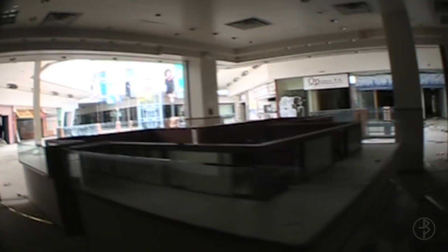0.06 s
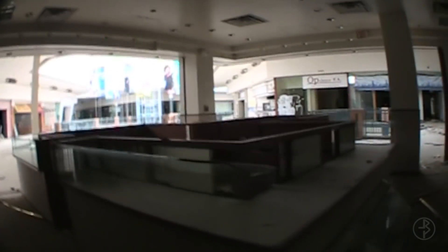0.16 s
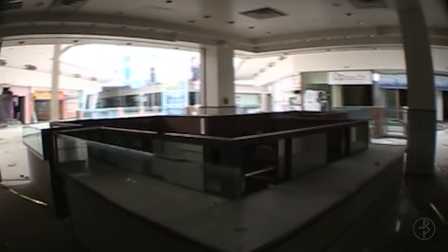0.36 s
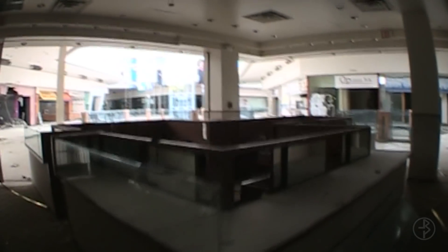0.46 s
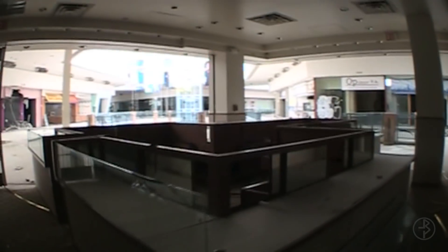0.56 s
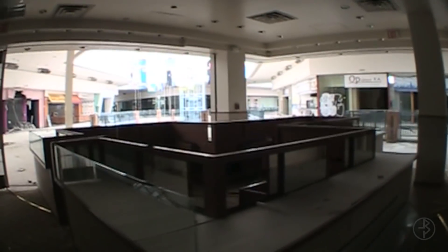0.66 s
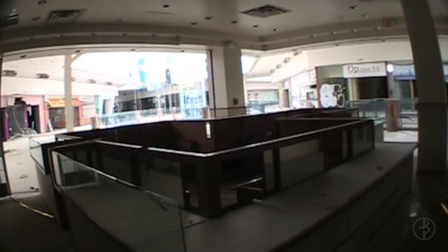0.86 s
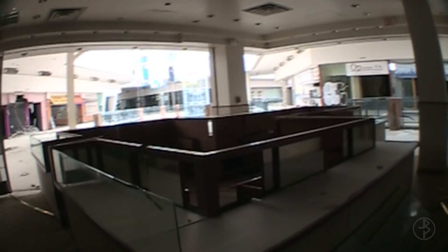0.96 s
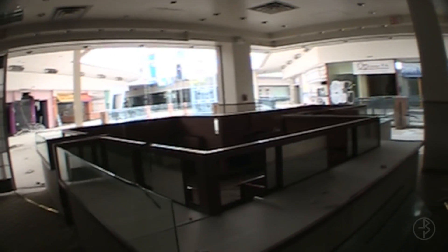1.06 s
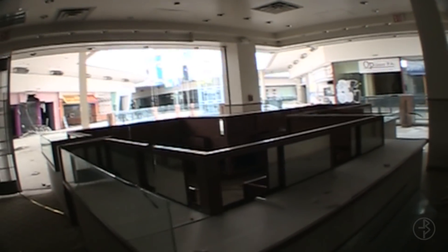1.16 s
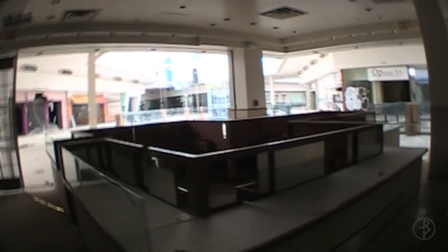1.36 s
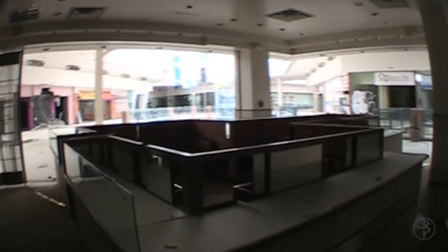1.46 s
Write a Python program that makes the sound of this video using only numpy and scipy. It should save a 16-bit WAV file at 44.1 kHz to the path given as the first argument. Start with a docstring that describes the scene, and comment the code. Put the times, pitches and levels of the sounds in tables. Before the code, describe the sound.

Glass crunches underfoot, close to a stereo microphone that overloads on the hardest snaps; a shard clinks and slides off, last bits tick as the foot settles, with long echoes and soft air noise in a vacant hall.

```python
"""One slow step on broken glass in a large empty hall, heard close up through two microphone ports.
A few light pieces crack first; then the sole grinds splinters, made as filtered random grains, while
larger pieces snap as pitched knocks and noise cracks, sound the floor and overload the microphone.
A shard springs free, rings as decaying sines and skitters over the floor in a spray of short pings.
A chip and a few last pieces tick as the foot settles; echoes and a steady hush of noise fill the hall."""
import sys
import numpy as np
from scipy import signal
from scipy.fft import rfft, irfft, next_fast_len
from scipy.io import wavfile

SR = 44100
rng = np.random.default_rng(int(sys.argv[2]) if len(sys.argv) > 2 else 0)


def persist_wave(psi):
    """Save psi, clipped to +-1, as 16-bit WAV."""
    counts = np.round(np.clip(psi, -1, 1) * 32767).astype(np.int16)
    wavfile.write(sys.argv[1], SR, np.atleast_2d(counts).T)


N = 66150


def amp(db):
    """Decibels to gain."""
    return 10 ** (np.asarray(db) / 20)


def unit(x):
    """Scale to rms 1."""
    return x / np.sqrt(np.mean(x ** 2) + 1e-20)


def along(points, hz):
    """Read a table of (f/Hz, value) at any frequency, on a log axis."""
    f, value = np.transpose(points)
    return np.interp(np.log(hz + 1), np.log(f + 1), value)


def level(rows):
    """Gain per sample from (t/s, level/dB) points, -100 dB outside them."""
    s, db = np.transpose(rows)
    return amp(np.interp(np.arange(N) / SR, s, db, left=-100, right=-100))


def since(s):
    """Seconds since s, zero before."""
    return np.maximum(np.arange(N) / SR - s, 0)


def decay(t, t60):
    """Exponential decay that falls 60 dB in t60 seconds."""
    return np.exp(-np.log(1000) * t / t60)


def burst(s, t60, rise_s=.0002):
    """A quick rise at s and an exponential decay."""
    t = since(s)
    return (1 - np.exp(-t / rise_s)) * decay(t, t60)


def ring(s, hz, t60, rise_s=.0002):
    """One mode struck at s: a decaying sine."""
    return burst(s, t60, rise_s) * np.sin(2 * np.pi * hz * since(s))


def filtered(x, response):
    """Multiply the spectrum of x by a response of frequency."""
    size = next_fast_len(N + SR // 2)
    return irfft(rfft(x, size) * response(np.fft.rfftfreq(size, 1 / SR)), size)[..., :N]


def resonate(x, peaks):
    """Lift or dip x at resonances given as (f/Hz, width/Hz, boost/dB)."""
    def response(f):
        gain = 1
        for hz, width, db in peaks:
            band = 1j * f * width
            gain = gain + (amp(db) - 1) * band / (hz * hz - f * f + band)
        return gain
    return filtered(x, response)


def spread(pair, spectrum, alike):
    """Colour two unrelated signals and blend them into stereo of rms 1."""
    def mid_side(hz):
        turn = np.arccos(np.clip(along(alike, hz), -1, 1)) / 2
        return amp(along(spectrum, hz)) * [np.cos(turn), np.sin(turn)]
    mid, side = filtered(pair, mid_side)
    return unit(np.array([mid + side, mid - side]))


def noise(spectrum, alike):
    """Coloured stereo noise of rms 1."""
    return spread(rng.standard_normal((2, N)), spectrum, alike)


# how alike close sounds are at the two microphone ports: f/Hz, left-right likeness
NEAR_ALIKE = [(100, 1), (1000, 0.98), (3000, 0.9), (8000, 0.75), (14000, 0.85)]

# pieces snapping under the sole:
# t/s, knock level/dB, knock f/Hz, crack level/dB, crack t60/s, crack f/Hz
SNAPS = [(.0250, -33.5, 1730, -36, 0.015, 1980), (0.0557, -30, 1554, -54, 0.0074, 1900),
         (0.0994, -29.5, 680, -33, 0.0089, 1490), (0.165, -24.5, 440, -28.5, 0.019, 1480),
         (0.2529, -32, 1460, -10.5, 0.017, 6900), (0.2589, -27, 1310, -3, 0.019, 6050),
         (0.2798, -1.5, 1334, -28, 0.0057, 1984), (0.3448, 0, 1040, -0.5, 0.012, 5740),
         (0.3574, -11.5, 1050, -6.5, 0.0082, 3930), (0.3735, -34, 1100, -16, 0.0073, 2400),
         (0.3934, -3.5, 1380, 0, 0.0094, 3660), (0.4077, -7, 970, -10.5, 0.031, 3740),
         (0.4176, -22, 810, -18, 0.0028, 3000), (0.443, 2.5, 1003, -5, 0.016, 5030),
         (0.4531, -7, 1110, 2.5, 0.004, 5750), (0.6429, -11.5, 1210, -20, 0.013, 2370),
         (0.671, -5.5, 1150, -13.5, 0.0085, 3220), (0.7386, -23, 953, -20.5, 0.0066, 5350),
         (1.0995, -35, 1190, -31, 0.0081, 1800), (1.155, -61, 1200, -19, 0.0082, 4200),
         (1.1673, -42, 2500, -21.5, 0.0067, 6560), (1.2410, -50, 1000, -31, 0.015, 6270),
         (1.3010, -31, 970, -39, 0.028, 1200), (1.374, -32, 1060, -35, 0.013, 2000),
         (1.3981, -30, 605, -63, .006, 1190), (1.4620, -35.5, 600, -49, 0.0071, 1940)]
# colour shared by the cracks: f/Hz, level/dB
CRACK = [(100, -8.5), (600, -2.5), (1800, -3), (3200, 2.5), (4200, -2), (5800, 0), (8000, 0.5),
         (11000, 1.5), (15500, -9.5)]
CRACK_RISE_S = 0.00043
CRACK_FOCUS_DB, CRACK_WIDTH_OCT = 5, .3  # boost around each crack's own pitch
CRACK_TOP = 2.65  # a crack fades above this multiple of its pitch
# cycles to the knock's peak; more for a hard knock; how fast its pitch sags
KNOCK_CYCLES, KNOCK_GROWS, KNOCK_SAG = 0.44, 0.15, 0.088
KNOCK_LOW_HZ = 382  # the knocks carry little below this


def snaps():
    """Each piece gives a knock of a cycle or two, smothered by the sole, and a bright crack of its own pitch."""
    knocks, cracks = np.zeros(N), np.zeros((2, N))
    size = 4096  # samples a crack may last
    grid = np.fft.rfftfreq(size, 1 / SR) + 1
    splitting = noise(CRACK, NEAR_ALIKE)
    for s, knock_db, hz, crack_db, t60, crack_hz in SNAPS:
        u = since(s) * hz  # cycles since the snap
        cycles = KNOCK_CYCLES + KNOCK_GROWS * amp(knock_db)
        swell = (u / cycles * np.exp(1 - u / cycles)) ** 2
        sagging = u * (1 + KNOCK_SAG) / (1 + KNOCK_SAG * u)
        knocks -= amp(knock_db) * swell * np.sin(2 * np.pi * sagging)

        start = min(int(s * SR), N - size)
        span = slice(start, start + size)
        octaves = np.log2(grid / crack_hz)
        focus = amp(CRACK_FOCUS_DB * np.exp(-.5 * (octaves / CRACK_WIDTH_OCT) ** 2))
        focus = focus / np.hypot(1, (grid / (CRACK_TOP * crack_hz)) ** 2)
        crack = unit(irfft(rfft(splitting[:, span]) * focus))
        cracks[:, span] += amp(crack_db) * burst(s, t60, CRACK_RISE_S)[span] * crack
    low_cut = signal.butter(2, KNOCK_LOW_HZ, "highpass", fs=SR, output="sos")
    return signal.sosfilt(low_cut, knocks) + cracks


# grinding of the splinters: t/s, level/dB
GRIND = [(.0, -55.5), (.160, -51), (.170, -36), (.188, -36), (.203, -32.5), (.224, -36), (.229, -23),
         (.243, -16), (.256, -28), (.275, -26.5), (.325, -33), (.375, -32), (.425, -31), (.480, -33),
         (.500, -57), (.70, -60.5)]
# colour of the splinters: f/Hz, level/dB
SPLINTERS = [(60, -38), (200, -28), (450, -1.5), (900, -4), (1700, -1.5), (3000, 5.5), (4000, -3.5),
             (5500, 3.5), (7500, -3), (11000, -9.5), (13800, -9), (15800, -29)]
# resonances of the pieces ground under the sole: f/Hz, width/Hz, boost/dB
PIECES = [(3140, 51, -0.5), (6100, 42, -2), (7700, 38, 7), (9250, 54, 3), (13800, 250, 4)]
# the sole pressing on the floor: t/s, level/dB
PRESS = [(0, -62.5), (.155, -47), (.170, -37.5), (.20, -41), (.22, -42), (.26, -33.5), (.33, -35.5),
         (.40, -33), (.475, -33.5), (.51, -53.5), (.75, -42)]
# colour of the pressing sole: f/Hz, level/dB
SOLE = [(25, -27), (70, -21), (130, -6.5), (200, -1.5), (320, 0.5), (480, -4), (900, -0.5), (1800, -11),
        (5000, -39)]
FIZZ_HZ, FIZZ_GROWS = 8400, 0.48  # the harder the grinding, the more fizz above this pitch


def crunch():
    """The sole presses down and grinds the splinters, which ring the larger pieces; more force is brighter."""
    force = level(GRIND)
    splinters = resonate(grit(SPLINTERS), PIECES)
    fizz = filtered(splinters, lambda f: 1 - 1 / (1 + (f / FIZZ_HZ) ** 8))
    dull = splinters - fizz
    grinding = dull + 2 * fizz * (force / force.max()) ** FIZZ_GROWS
    return force * grinding + level(PRESS) * noise(SOLE, NEAR_ALIKE)


GRAINS_PER_S, GRAIN_SPREAD_DB = 1800, 1.5
DUST_DB = -1  # relative to the grains


def grit(spectrum):
    """Dense tiny fractures of uneven size over a bed of dust, rms 1."""
    sizes = amp(GRAIN_SPREAD_DB * np.minimum(rng.exponential(size=N), 4))
    grains = (rng.random(N) < GRAINS_PER_S / SR) * sizes * rng.standard_normal((2, N))
    dust = amp(DUST_DB) * rng.standard_normal((2, N))
    return spread(unit(grains) + dust, spectrum, NEAR_ALIKE)


# the weight of the foot dropping onto the floor: t/s, level/dB
DROPS = [(0.2811, -7.5), (0.3451, -2), (0.3934, 0.5), (0.4077, -5.5), (0.4426, 5.5)]
# the floor's dull answer to each drop: f/Hz, level/dB, t60/s
THUD = [(128.4, -46, .15), (176, -51, 0.08), (204.2, -28, 0.14), (256, -30.5, 0.054), (325.6, -32, 0.15)]
THUD_RISE_S = 0.0015


def thud():
    """As the larger pieces give way the foot drops a little and sounds the floor's low modes."""
    floor = np.zeros(N)
    for s, drop_db in DROPS:
        for hz, db, t60 in THUD:
            floor += amp(drop_db + db) * ring(s, hz, t60, THUD_RISE_S)
    return floor


# the loose shard's modes: f/Hz, level/dB, t60/s, pan (left minus right)/dB, t/s when the floor smothers it
SHARD = [(1133, -38, 3.5, 1.5, 0.638), (2214, -32.5, 4.5, -1.5, 0.617), (2879, -18.5, 0.73, 2.5, 0.5735),
         (5303, -14, 0.035, 2, .51), (6410, -10, 0.08, 2, .52), (6360, -31.5, 0.88, 13, 0.55),
         (12730, -10.5, 0.047, 9, .51), (13700, -17, 0.04, -5, .51)]
# its bounces on the floor, each sounding one note: t/s, level/dB, f/Hz, t60/s
BOUNCES = [(0.508, -19.5, 3612, 0.17), (0.507, -17, 6260, 0.05), (0.525, -23.5, 7400, 0.11),
           (0.535, -28, 6100, 0.07), (.5530, -27.5, 2290, 0.14)]
# colour of the tick as it springs free: f/Hz, level/dB
TICK = [(1000, -16), (2800, 4), (4000, -37), (5500, -20), (7700, -1.5), (10000, 10.5), (12700, 5.5),
        (14000, 5), (15500, -3)]
# the shard sliding between contacts: t/s, level/dB
SLIDE = [(.487, -58), (0.505, -31.5), (.538, -22), (.565, -24.5), (0.61, -29), (.635, -39), (.70, -48),
         (.80, -90)]
CLINK_S, CLINK_TICK_DB = .4890, -8.5  # the shard springs free
TICK_T60, TICK_RISE_S = 0.032, .0006  # seconds
SMOTHER_T60 = .05  # seconds


def shard():
    """A shard springs free with a bright tick, rings until the floor smothers it, and slides among the crumbs."""
    rings = np.zeros((2, N))
    for hz, db, t60, pan_db, stop in SHARD:
        sides = amp([[db + pan_db / 2], [db - pan_db / 2]])
        rings += sides * ring(CLINK_S, hz, t60) * decay(since(stop), SMOTHER_T60)
    bounces = sum(amp(db) * ring(s, hz, t60) for s, db, hz, t60 in BOUNCES)
    tick = amp(CLINK_TICK_DB) * burst(CLINK_S, TICK_T60, TICK_RISE_S) * noise(TICK, NEAR_ALIKE)
    return rings + bounces + tick + level(SLIDE) * tinkle()


# range of the crumbs' pings: lowest f/Hz, highest f/Hz
PING_HZ = (2020, 15540)
# resonances stirred by the sliding shard: f/Hz
SLIDE_HZ = [4520, 6105, 6386, 7580, 9125, 12190, 13950]
# colour of the slide: f/Hz, level/dB
SCRAPE = [(400, -48), (1200, -16), (2300, -2.5), (4000, -5.5), (5200, -1.5), (6400, 2), (7600, 0),
          (8700, -11), (9900, -4.5), (12500, -3.5), (15500, -22)]
PINGS_PER_S, PING_T60 = 3500, .11  # t60 in seconds
PING_DUST_DB = -3  # fine scrape relative to the pings
SLIDE_WIDTH_HZ, SLIDE_BOOST_DB = 60, 8


def tinkle():
    """Short pings of crumbs and a fine scrape keep the glass singing; rms 1 while the shard slides."""
    start, end = SLIDE[0][0], SLIDE[-1][0]
    length = end - start
    draws = rng.random((int(PINGS_PER_S * length), 4))  # pitch, moment, left size, right size
    k = np.arange(SR // 20)  # each ping is cut after 50 ms
    hz = PING_HZ[0] + (PING_HZ[1] - PING_HZ[0]) * draws[:, :1]
    pings = np.sin(2 * np.pi * hz * k / SR) * decay(k / SR, PING_T60)
    first = ((start + draws[:, 1:2] * length) * SR).astype(int)
    where = (first + k).ravel()
    pair = np.array([np.bincount(where, (pings * (size[:, None] - .5)).ravel(), N)[:N]
                     for size in draws.T[2:]])
    dust = unit((pair != 0) * rng.standard_normal((2, N)))
    scrape = unit(pair) + amp(PING_DUST_DB) * dust
    scrape = resonate(scrape, [(f, SLIDE_WIDTH_HZ, SLIDE_BOOST_DB) for f in SLIDE_HZ])
    return spread(scrape, SCRAPE, NEAR_ALIKE) * np.sqrt(length * SR / N)


# a tiny chip landing twice: t/s, tick level/dB, tone level/dB
CHIPS = [(.8248, -17, -43), (.881, -60, -46.5)]
CHIP_HZ, CHIP_T60 = 3951, .22  # t60 in seconds


def chip():
    """A tiny chip touches the floor with a thin tick and a faint tone, then bounces and lands again with hardly
    more than the tone."""
    ticks = sum(amp(tick_db) * burst(s, .002, .00005) for s, tick_db, _ in CHIPS)
    tone = sum(amp(tone_db) * ring(s, CHIP_HZ, CHIP_T60) for s, _, tone_db in CHIPS)
    return tone + ticks * noise([(2000, -20), (7000, 0), (15000, 0)], NEAR_ALIKE)


# echo off the nearby counter and ceiling: f/Hz, t60/s
NEAR_T60 = [(200, 0.19), (1000, 0.16), (4000, 0.12), (12000, 0.36)]
# echo of the whole hall: f/Hz, t60/s
HALL_T60 = [(200, 4.9), (1000, 1.65), (4000, 2.5), (8000, 1.13), (14000, 1.74)]
NEAR_DB, NEAR_DELAY_S = -5, .004
HALL_DB, HALL_DELAY_S = -18, .025


def echoes(send):
    """A short answer from the surfaces close by and a long, quieter one from the hall."""
    near = amp(NEAR_DB) * echo(send, NEAR_T60, NEAR_DELAY_S)
    return near + amp(HALL_DB) * echo(send, HALL_T60, HALL_DELAY_S)


def echo(x, t60s, delay_s):
    """A diffuse noise tail in which each frequency dies at its own speed."""
    white = noise([(20, 0), (20000, 0)], NEAR_ALIKE)
    hz, t, z = signal.stft(white, SR, nperseg=256)
    fading = amp(-60 * t / along(t60s, hz)[:, None])
    tail = signal.istft(z * fading, SR, nperseg=256)[1]
    tail = tail / np.linalg.norm(tail[0])
    tail = np.pad(tail, ((0, 0), (int(abs(delay_s) * SR), 0)))
    return signal.fftconvolve(x, tail, axes=1)[:, :N]


# phase between the two microphone ports: f/Hz, radians by which the left leads
PORT_PHASE = [(3000, 0), (6000, -0.23), (7400, 1.17), (8300, 2), (12400, 3), (15000, 7)]
# tilt between the ports: f/Hz, left minus right level/dB
PORT_TILT = [(500, -0.1), (1200, 1), (2500, 1.5), (4500, -0.7), (8000, -3), (12000, -0.5)]


def ports(sound):
    """The two ports take the sound with a level and phase difference that vary with frequency."""
    sides = np.array([[.5], [-.5]])

    def response(hz):
        return amp(sides * along(PORT_TILT, hz)) * np.exp(1j * sides * along(PORT_PHASE, hz))
    return filtered(sound, response)


# colour of the empty hall's hush: f/Hz, level/dB
AIR = [(15, -41), (25, -1.5), (130, -1.5), (189, -2), (324, 1), (352, -1), (486, -1.5), (981, -7),
       (1780, -9), (4100, -12.5), (4950, -13), (7030, -14.5), (15800, -36)]
# how alike the hush is at the two ports: f/Hz, left-right likeness
AIR_ALIKE = [(60, -0.69), (240, -0.14), (950, 0.24), (3770, 0.53), (15000, -0.13)]
AIR_DB = -46.5


def hush():
    """The steady hush of the hall: wide coloured noise."""
    return amp(AIR_DB) * noise(AIR, AIR_ALIKE)


RING_WET = .25  # share of the shard that feeds the echoes


def scene():
    """The step, its echoes and the hush of the hall at two microphone ports."""
    step = snaps() + crunch() + chip()
    glass = shard()
    sound = step + glass + thud() + echoes(step + RING_WET * glass)
    return ports(sound) + hush()


CLIP_TOP = 1.0  # full scale
TOP_HZ = 15900


def record(dry):
    """The loudest snaps overload the microphone; nothing is kept above the band limit."""
    clipped = dry / (1 + np.abs(dry / CLIP_TOP) ** 8) ** (1 / 8)
    return filtered(clipped, lambda hz: hz < TOP_HZ)


dry = scene()
out = record(dry)
persist_wave(out)
```